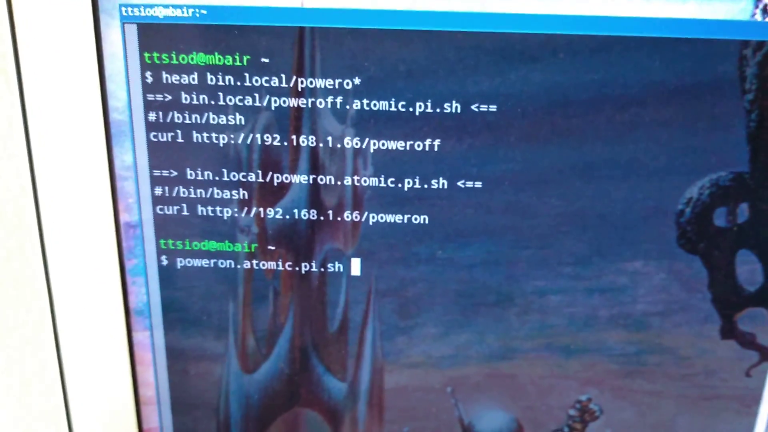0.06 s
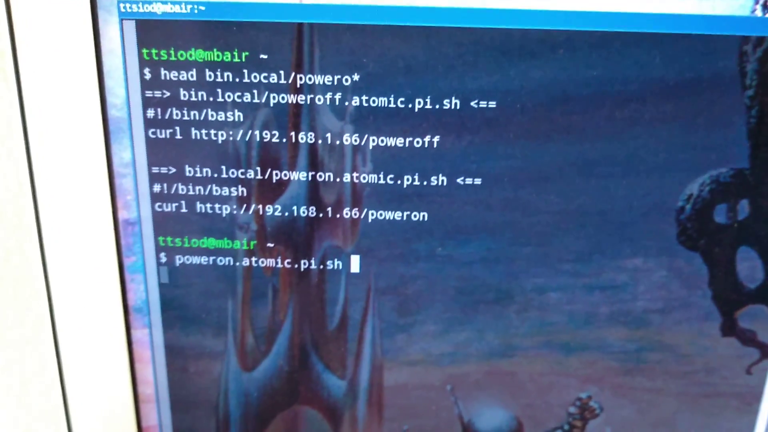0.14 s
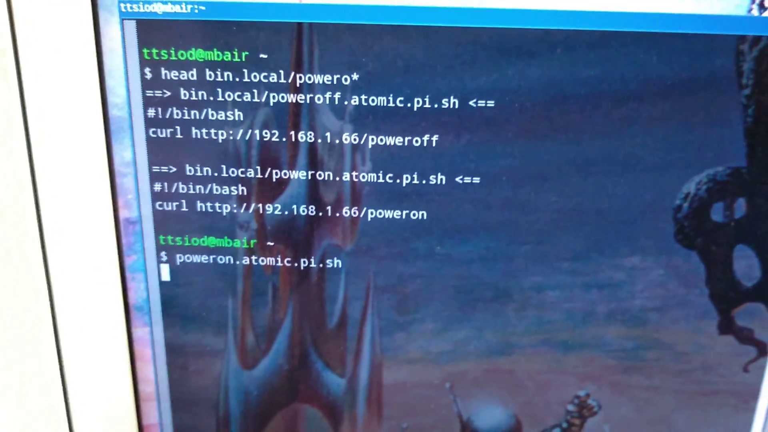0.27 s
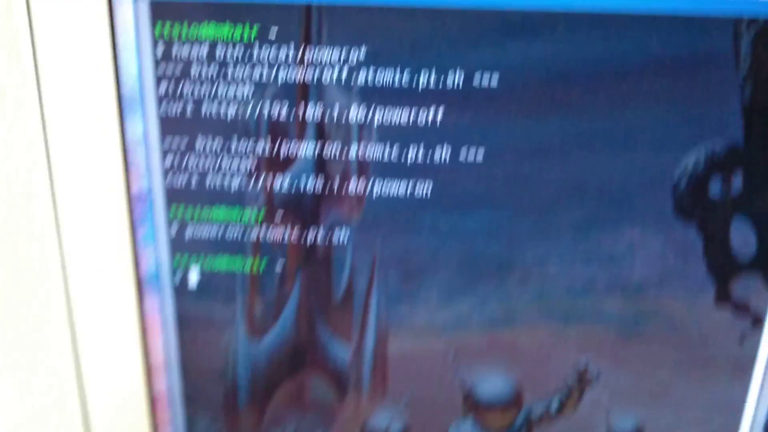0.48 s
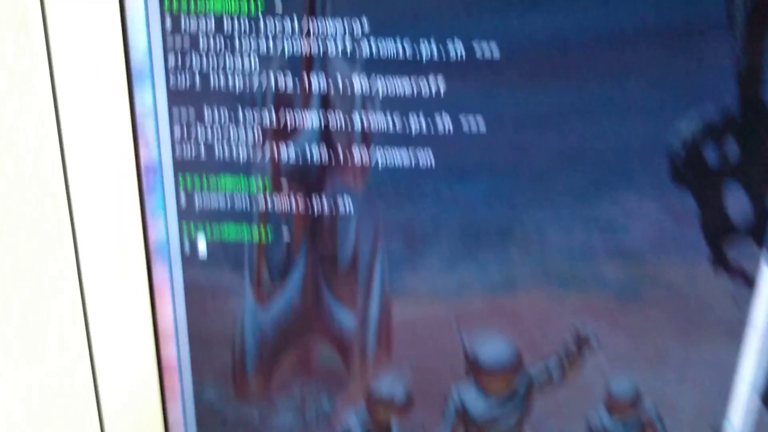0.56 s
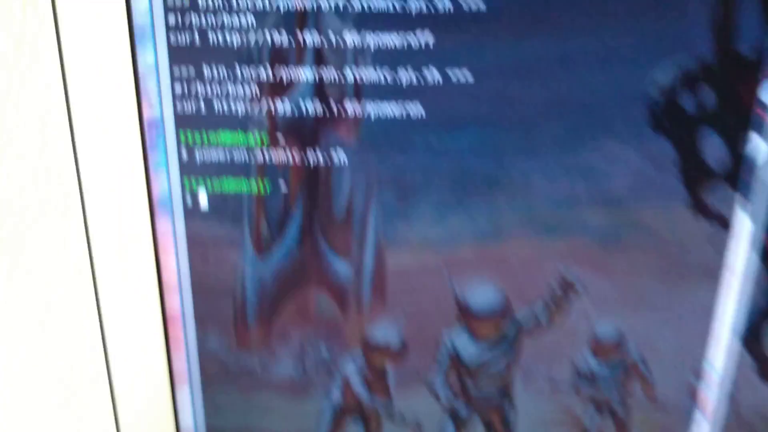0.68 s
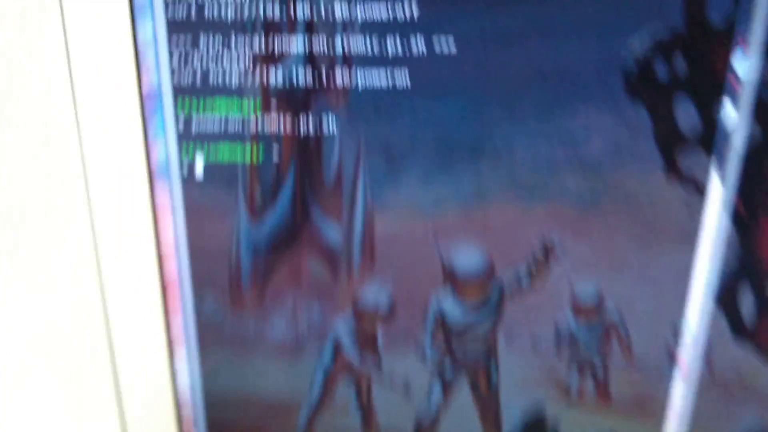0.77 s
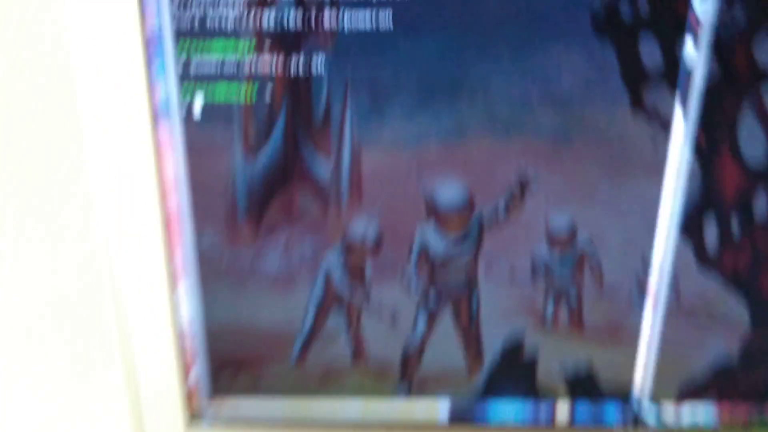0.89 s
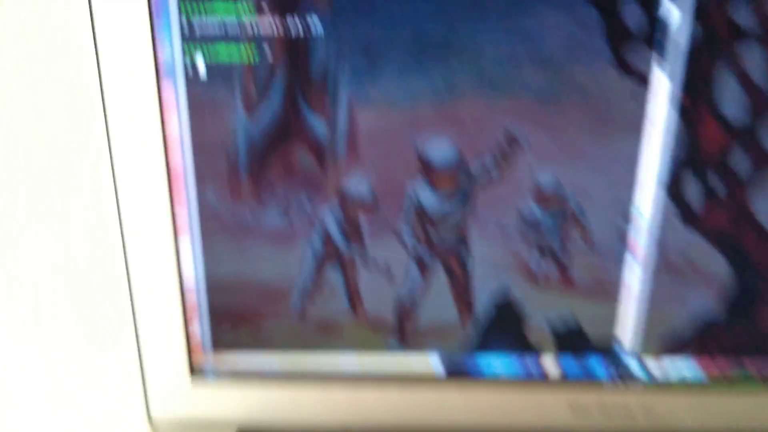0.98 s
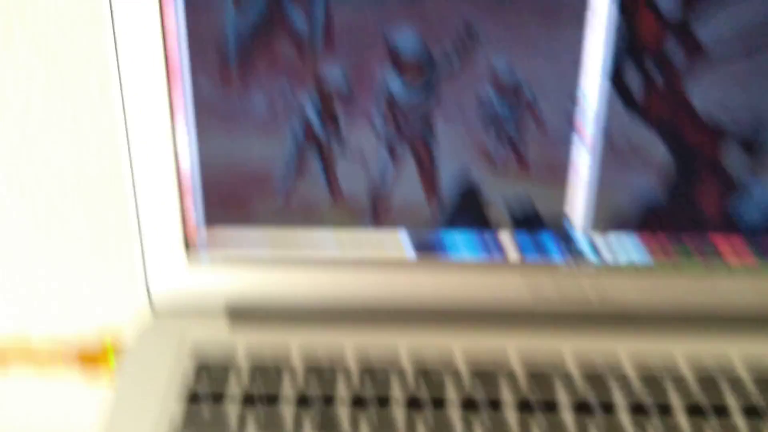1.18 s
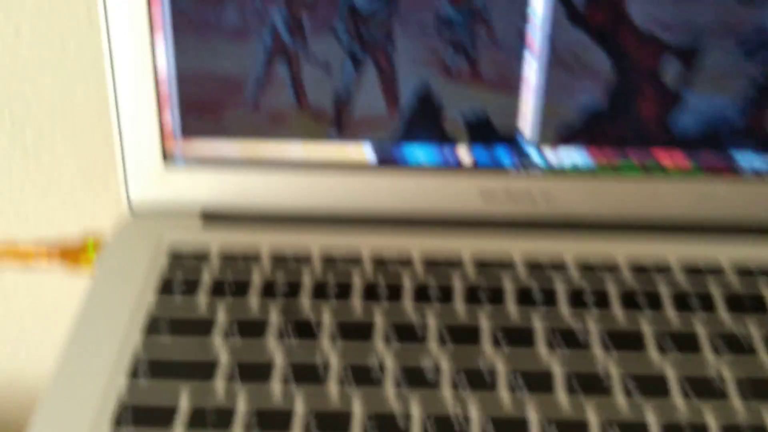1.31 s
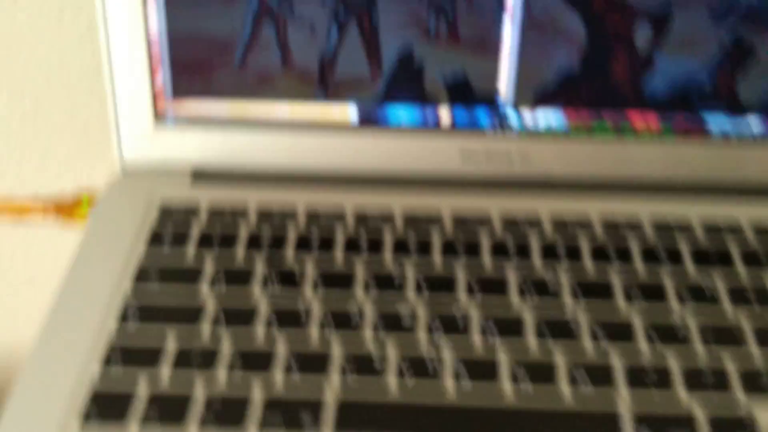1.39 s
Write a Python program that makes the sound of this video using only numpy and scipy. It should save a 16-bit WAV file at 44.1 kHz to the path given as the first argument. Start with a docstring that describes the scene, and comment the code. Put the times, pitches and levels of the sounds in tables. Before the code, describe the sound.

Crisp keyboard key press, followed by a tiny metallic click ringing briefly across a quiet room.

```python
"""Laptop key, then a bright far click

A laptop key is struck and let go near a hand-held camera in a quiet room: short blows ring the modes of key
and case, with a snap and a noise crack on each. A small bright click further off, bouncing and rattling,
hangs in the room as a noise tail; a soft low bump follows. Filtered noise makes the room tone.
Two microphone ports feed each other inverted and half a millisecond late."""
import sys
import numpy as np
from scipy import signal
from scipy.fft import rfft, irfft
from scipy.io import wavfile
from scipy.ndimage import uniform_filter1d

SR = 44100
rng = np.random.default_rng(int(sys.argv[2]) if len(sys.argv) > 2 else 0)


def dump(signal):
    """Clip the signal to [-1, 1] and save it as 16-bit WAV at the path in sys.argv[1]."""
    limited = np.clip(np.atleast_2d(signal).T, -1, 1)
    pcm = np.round(limited * 32767).astype(np.int16)
    wavfile.write(sys.argv[1], SR, pcm)


N = 63945
T = np.arange(N) / SR
F = np.fft.rfftfreq(N, 1 / SR)
LOG_F = np.log(np.maximum(F, 1))


def undb(db):
    """Decibels to an amplitude factor."""
    return 10 ** (np.asarray(db) / 20)


def late(x, samples, db=0):
    """Fractional delay and gain by turning phases; both may vary with pitch."""
    return irfft(rfft(x) * undb(db) * np.exp(-2j * np.pi * F * samples / SR), N)


def ports(x, lag, pan_db):
    """Place a sound by its lag in samples and its level, left against right."""
    left = late(x, lag / 2, pan_db / 2)
    right = late(x, -lag / 2, -pan_db / 2)
    return np.array([left, right])


def conv(a, b):
    """Let a excite the response b."""
    return signal.fftconvolve(a, b)[:N]


def fade(t, t60):
    """Exponential decay from t = 0, down 60 dB after t60 seconds."""
    return (t >= 0) * np.exp(-np.log(1000) * np.maximum(t, 0) / t60)


def ring(modes, opposed_hz=0):
    """Impulse response of decaying modes, peak 1; every other mode above opposed_hz swings inverted."""
    t = T[:SR // 4]
    y = np.zeros(len(t))
    for k, (hz, db, t60) in enumerate(modes):
        sign = -1 if k % 2 and hz > opposed_hz else 1
        y += sign * undb(db) * fade(t, t60) * np.sin(2 * np.pi * hz * t)
    return y / np.abs(y).max()


def push(s, ms):
    """A blow as a bell-shaped pulse of unit area, ms being four standard deviations."""
    p = np.exp(-.5 * ((T - s) / (ms / 4000)) ** 2)
    return p / p.sum()


def walk(rate):
    """Slow random drift, spread near 1: random steps at this rate per second, smoothed twice."""
    k = int(SR / rate)
    steps = np.repeat(rng.standard_normal(N // k + 1), k)
    return 1.23 * uniform_filter1d(uniform_filter1d(steps, k), k)[:N]


def octave(hz):
    """Smooth band weight; bands an octave apart sum to 1 in power."""
    return np.cos(np.clip(np.log2(np.maximum(F, 1) / hz), -1, 1) * np.pi / 2)


# Colour of the room tone. Each row: pitch in Hz, relative level in dB per Hz, share of power common to
# both ports (0-1).
TONE_COLOUR = [(25.6, -11.5, .1), (65.6, -2, 0.85), (131, -2.5, 0.75), (242, -5, 0.94), (313, -14, 0.56),
               (727, -20.5, 0.14), (1300, -25, 0.13), (2290, -26.5, 0.04), (5200, -36.5, 0),
               (8600, -39, 0.04), (14000, -47.5, .05)]
# Low resonances in the tone. Each row: pitch in Hz, width in Hz, rise over the tone in dB.
TONE_RESONANCES = [(139.3, 8.1, 9.5), (180.8, 3.3, 2.5), (228, 8.9, 6)]


def steady_tone():
    """Coloured noise at unit level: a part shared by the ports and a part of each port's own."""
    hz0, db, share = np.array(TONE_COLOUR).T
    resonance_db = sum(d / (1 + (2 * (F - hz) / w) ** 2) for hz, w, d in TONE_RESONANCES)
    gain = undb(np.interp(LOG_F, np.log(hz0), db) + resonance_db)
    common = np.clip(np.interp(LOG_F, np.log(hz0), share), 0, 1)
    noise = rfft(rng.standard_normal((3, N)))
    spec = gain * (np.sqrt(common) * noise[0] + np.sqrt(1 - common) * noise[1:])
    return spec / np.sqrt(np.mean(irfft(spec, N) ** 2))


SWELL_DB, FLICKER_DB = 0.46, 1.32  # spread of the slow drift in level and of the drift in each octave
BASS_HZ, TREBLE_HZ = 350, 3500  # octaves centred below / above these follow the bass / treble columns
# Room tone over time. Each row: time in seconds, level in dB, bass and treble in dB relative to that level.
TONE_LEVEL = [(0, -58.5, 6, 0), (.2, -57.5, 0, 1.5), (.45, -57.5, 2.5, 5), (.65, -56.5, 2.5, 0),
              (.8, -54.5, 0.5, 1.1), (.95, -55, 2, 0.2), (1.15, -53, -0.1, 0.7), (1.3, -54, -0.5, -0.1),
              (1.45, -54.5, 1.5, -0.3)]


def tone():
    """Room tone whose level, bass and treble move over time, each octave flickering a little."""
    spec = steady_tone()
    s, *columns = np.array(TONE_LEVEL).T
    level, bass, treble = (np.interp(T, s, v) for v in columns)
    y = np.zeros((2, N))
    for hz in 30.9 * 2. ** np.arange(10):
        band_db = FLICKER_DB * walk(11.16) + bass * (hz < BASS_HZ) + treble * (hz > TREBLE_HZ)
        y += irfft(spec * octave(hz), N) * undb(band_db)
    return y * undb(level + SWELL_DB * walk(2.08))


ROOM_DELAY_S, ROOM_RISE_S = 0.0017, 0.0036
# Decay of the room. Each row: pitch in Hz, time to fall 60 dB in seconds.
ROOM_T60 = [(300, 0.85), (700, 0.43), (1500, 0.54), (2800, .35), (6000, 0.7), (9000, 0.47), (13000, 0.41)]


def room(x):
    """A diffuse tail: noise unrelated at each port, rising softly and decaying at its own pace per octave."""
    t = T - ROOM_DELAY_S
    hz0, t60 = np.array(ROOM_T60).T
    out = []
    for noise in rfft(rng.standard_normal((2, N))):
        tail = np.zeros(N)
        for hz in 250 * 2. ** np.arange(7):
            band_t60 = np.interp(np.log(hz), np.log(hz0), t60)
            tail += irfft(noise * octave(hz), N) * fade(t, band_t60)
        tail *= 1 - np.exp(-np.maximum(t, 0) / ROOM_RISE_S)
        out.append(conv(x, tail / np.sqrt(np.sum(tail ** 2))))  # unit energy
    return np.array(out)


THUMP_S, THUMP_HZ, THUMP_DB, THUMP_T60_S = 1.098, 292, -43, 0.11


def thump():
    """A soft low bump: one short push rings a single low mode."""
    return conv(push(THUMP_S, 0.38), ring([(THUMP_HZ, 0, THUMP_T60_S)])) * undb(THUMP_DB)


CLICK_LAG, CLICK_PAN_DB = 18.54, -8  # left behind right in samples, left over right in dB
CLICK_WALL_S, CLICK_WET_DB = 0.013, 8  # extra way via the walls, send to the room
RATTLE_DB, RATTLE_RISE_S, RATTLE_T60_S = -27, 0.00057, 0.038
# Contact of the far click and its bounces. Each row: start in seconds, level in dB.
CLICK_HITS = [(.3789, -45), (.3797, -33), (.3807, -32.5), (.3820, -32.5), (.3834, -38), (.3876, -58)]
# Modes of the far click. Each row: pitch in Hz, level in dB, time to fall 60 dB in seconds, extra level
# towards the walls in dB.
CLICK_MODES = [(3380, -21, 0.0079, -10), (4180, -12, 0.0042, -19), (5140, -16.5, .005, -2),
               (5620, -3.5, 0.011, -11), (6110, 1.5, 0.0096, -15), (6760, -8, 0.0096, 0.5),
               (7570, -1.5, 0.01, 3), (8090, -4, 0.031, 3), (9270, -1.5, 0.023, -2.5), (9770, -4, 0.014, 3),
               (10130, -2.5, 0.0042, 0.5), (11270, -7, 0.014, -2.5), (12160, -4.5, .007, -0.5),
               (14700, -6.5, 0.0035, -1)]


def click():
    """A small metal contact closes, bounces and rattles; the walls get another colour than the camera."""
    start = CLICK_HITS[0][0]
    t = T - start
    body = ring([m[:3] for m in CLICK_MODES])
    rattle_force = rng.standard_normal(N) * fade(t, RATTLE_T60_S) * np.clip(t / RATTLE_RISE_S, 0, 1)
    rattle = conv(rattle_force, body)
    hits = sum(undb(db) * push(s, 0.048) for s, db in CLICK_HITS)
    near = conv(hits, body) + undb(RATTLE_DB) * rattle / np.abs(rattle).max()
    # one hit, as loud as the loudest contact, reaches the walls
    wall_hit = undb(max(db for _, db in CLICK_HITS)) * push(start + CLICK_WALL_S, 0.033)
    wall_body = ring([(hz, db + wall_db, t60) for hz, db, t60, wall_db in CLICK_MODES])
    return ports(near, CLICK_LAG, CLICK_PAN_DB), undb(CLICK_WET_DB) * conv(wall_hit, wall_body)


CASE_LOW_HZ, OPPOSED_HZ = 410, 1700  # low cut of the case, pitch above which every other mode is inverted
DESK_HZ, DESK_DB, DESK_T60_S = 79, -26.5, 0.21  # the desk booms under the case
# Blows of the key. Each row: start in seconds, level in dB, contact time in ms, crack in dB over the blow.
KEY_BLOWS = [(.2118, -37, .12, -3), (.2135, -15, .12, -12), (.2153, -30, .12, -9), (.2185, -36, .15, -8),
             (.2220, -35, .15, -9), (.3176, -47, .07, 1), (.3190, -50, .07, -2)]
# Modes of key and case. Each row: pitch in Hz, level in dB, time to fall 60 dB in seconds.
KEY_MODES = [(494, -6, 0.052), (665, -0.5, 0.026), (752, -5.5, 0.04), (960, -4.5, 0.013), (1160, -2, 0.016),
             (1449, 1.5, 0.023), (1880, -6.5, 0.017), (2480, -2, 0.017), (2534, -0.5, 0.019),
             (2929, -7.5, 0.034), (3126, -4, 0.021), (3816, -8.5, 0.02), (5000, -5, 0.0041),
             (6880, -3.5, 0.0047)]


def key_blows():
    """Tick, bottoming blow, bounces and release all ring the same case and the desk under it."""
    force = sum(undb(db) * push(s, ms) for s, db, ms, _ in KEY_BLOWS)
    low_cut = signal.butter(4, CASE_LOW_HZ, "high", fs=SR, output="sos")
    case = signal.sosfilt(low_cut, ring(KEY_MODES, OPPOSED_HZ))
    desk = undb(DESK_DB) * ring([(DESK_HZ, 0, DESK_T60_S)])
    return conv(force, case + desk)


SNAP_DB, CRACK_T60_S, CRACK_HZ = 19, .012, 13000  # snap over crack level, crack decay, top of both
TRAVEL_S, TRAVEL_MS, TRAVEL_DB = .2099, 3.5, -37  # the key scrapes on its way down


def key_snap_and_crack():
    """Each blow sends a snap pulse and a fading noise crack; noise swells as the key scrapes down."""
    snap, env = np.zeros(N), np.zeros(N)
    for s, db, _, crack_db in KEY_BLOWS:
        snap += undb(db + crack_db + SNAP_DB) * push(s, 0.057)
        env += undb(db + crack_db) * fade(T - s, CRACK_T60_S)
    u = (T - TRAVEL_S) / TRAVEL_MS * 1000  # 0 to 1 along the travel
    env += undb(TRAVEL_DB) * ((u > 0) & (u < 1)) * np.sqrt(np.abs(u))
    band = signal.butter(3, [2000, CRACK_HZ], "band", fs=SR, output="sos")
    return signal.sosfilt(band, [snap, env * rng.standard_normal(N)])


KEY_LAG, KEY_LAG_HZ = -8, 1180  # left behind right in samples, reached in full above this pitch
KEY_WET_DB, SNAP_WET_DB = -14, -11  # sends to the room
# Place of the key between the ports. Each row: pitch in Hz, left over right in dB.
KEY_PAN = [(700, 1), (1000, 4.5), (1550, -14), (2400, -11.5), (3500, -9.5), (6500, 2), (8500, 3.5),
           (11000, 1), (12500, -2)]


def key():
    """The whole key, its lag and balance between the ports changing with pitch, and its room send."""
    blows = key_blows()
    snap, crack = key_snap_and_crack()
    hz0, balance_db = np.array(KEY_PAN).T
    pan_db = np.interp(LOG_F, np.log(hz0), balance_db)
    lag = KEY_LAG * np.minimum(F / KEY_LAG_HZ, 1) ** 2
    send = undb(KEY_WET_DB) * blows + undb(SNAP_WET_DB) * snap
    return ports(blows + snap + crack, lag, pan_db), send


def scene():
    """Room tone, bump, far click and key; click and key share one room tail."""
    click_near, click_send = click()
    key_near, key_send = key()
    return tone() + room(key_send + click_send) + thump() + click_near + key_near


PORT_LAG, PORT_GAIN, PORT_HZ = 21.3, 0.77, 5960  # samples, share passed at low pitch, pitch where it halves
TOP_HZ = 14250


def record(dry):
    """Each port is subtracted, late and duller, from the other; the top is cut."""
    dulling = PORT_GAIN / (1 + (F / PORT_HZ) ** 2)
    cross = irfft(rfft(late(dry, PORT_LAG)) * dulling, N)
    top_cut = signal.ellip(10, .2, 80, TOP_HZ, fs=SR, output="sos")
    return signal.sosfilt(top_cut, dry - cross[::-1])


dry = scene()
out = record(dry)
dump(out)
```